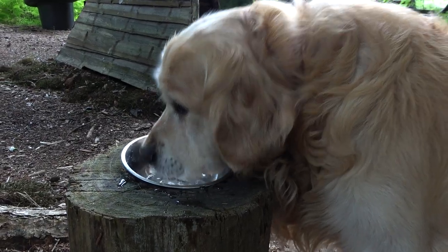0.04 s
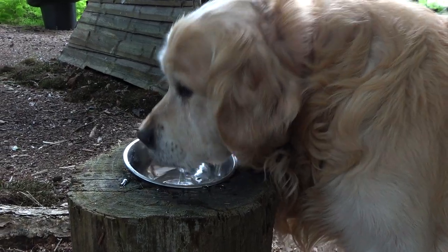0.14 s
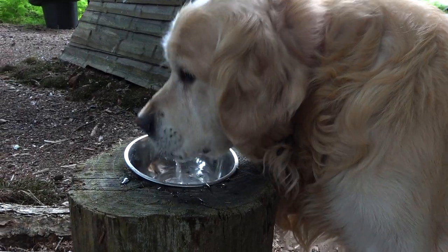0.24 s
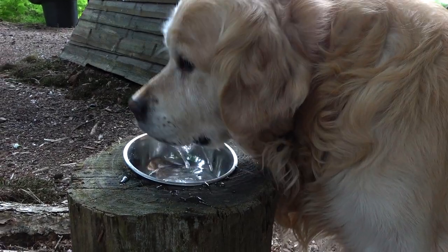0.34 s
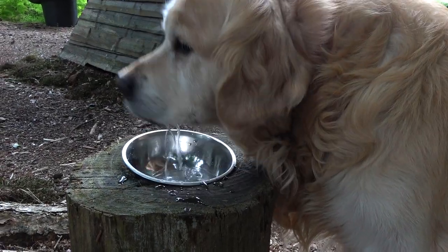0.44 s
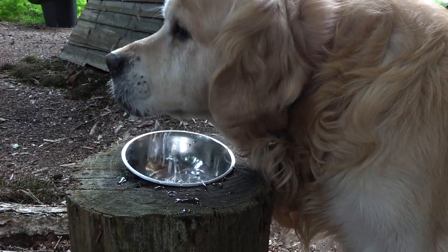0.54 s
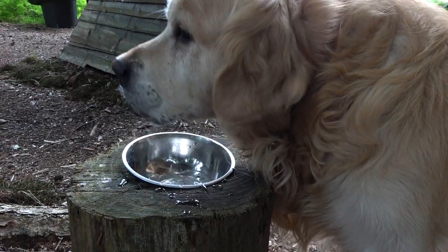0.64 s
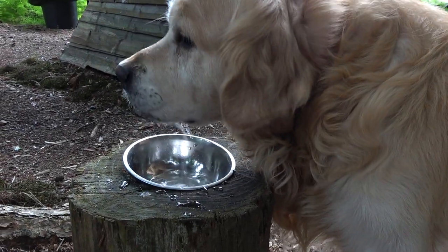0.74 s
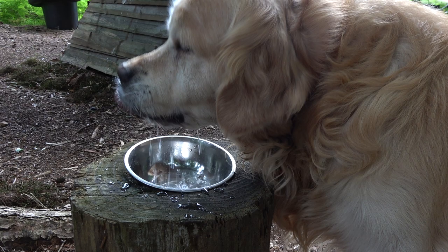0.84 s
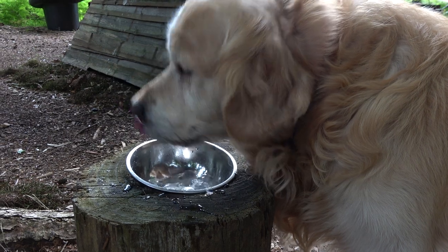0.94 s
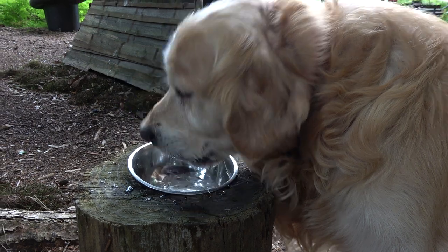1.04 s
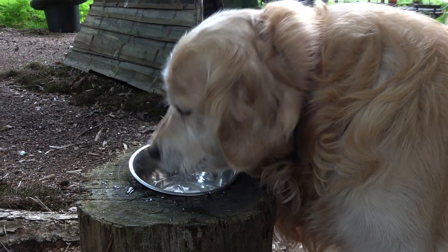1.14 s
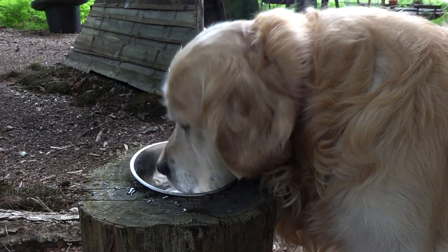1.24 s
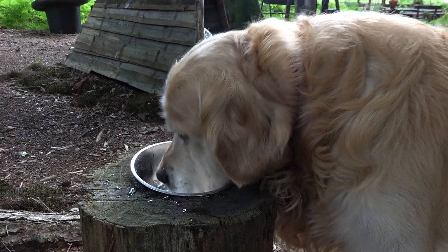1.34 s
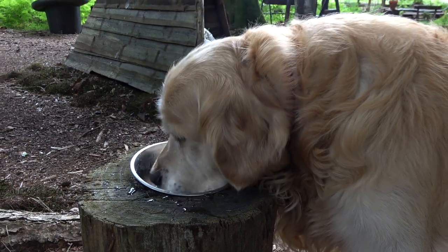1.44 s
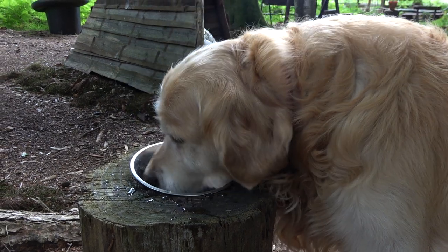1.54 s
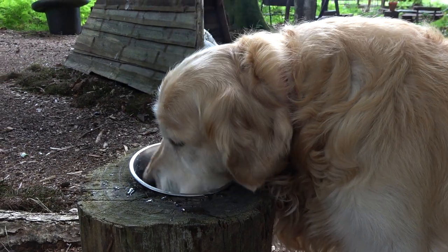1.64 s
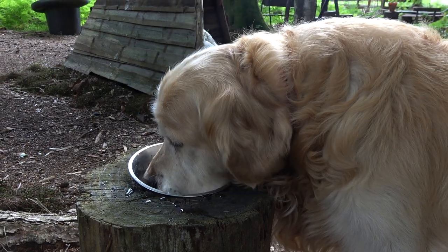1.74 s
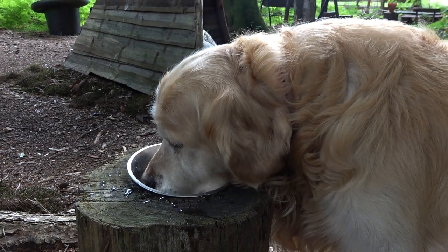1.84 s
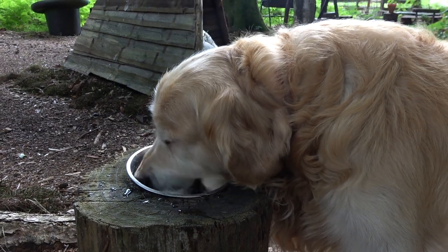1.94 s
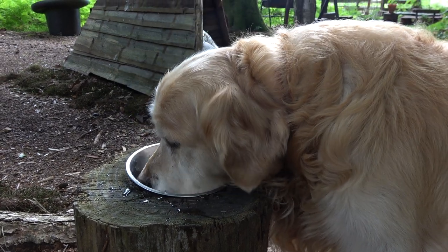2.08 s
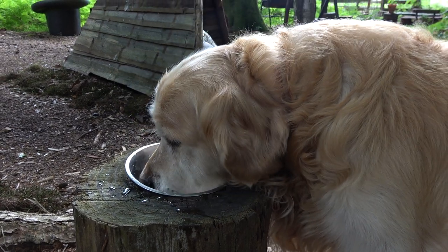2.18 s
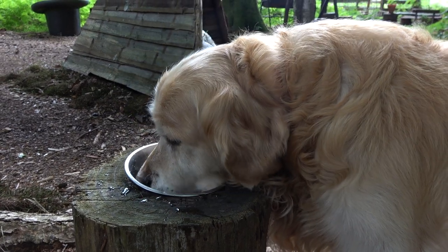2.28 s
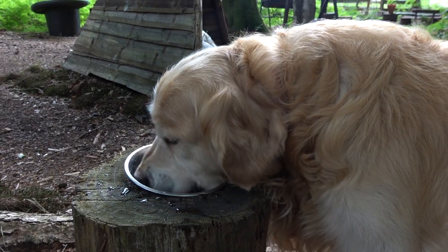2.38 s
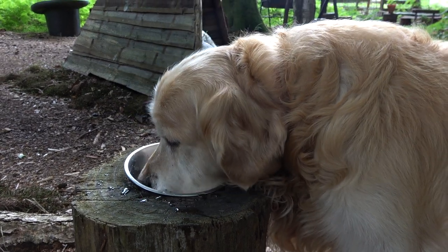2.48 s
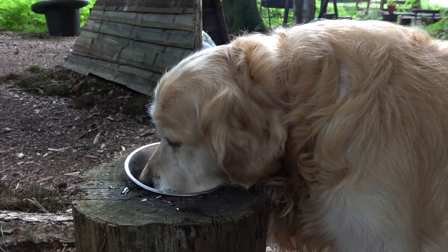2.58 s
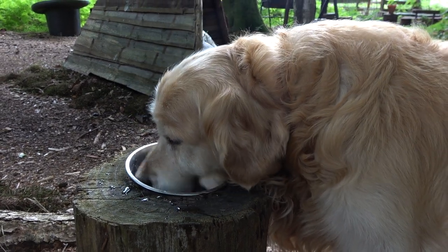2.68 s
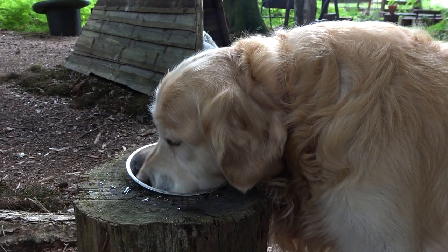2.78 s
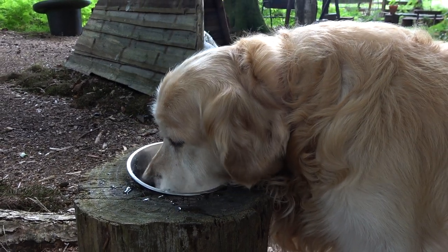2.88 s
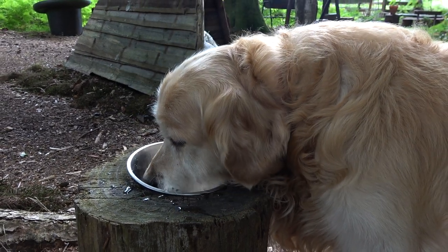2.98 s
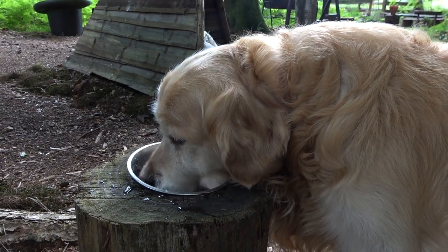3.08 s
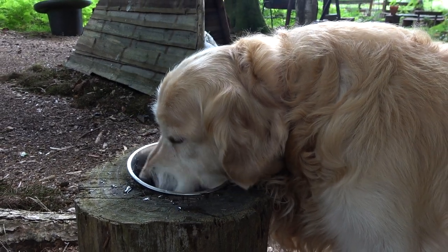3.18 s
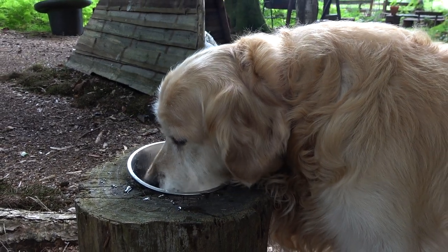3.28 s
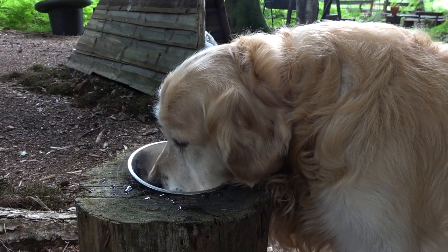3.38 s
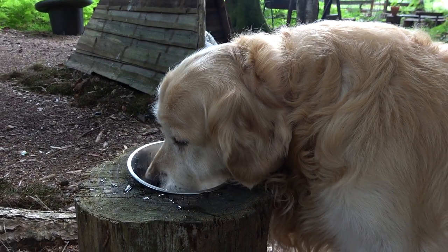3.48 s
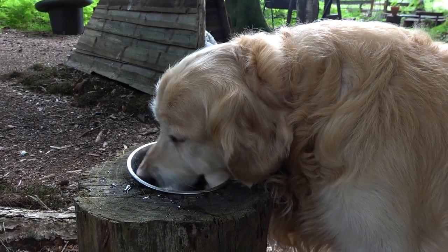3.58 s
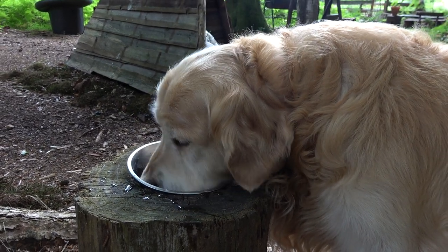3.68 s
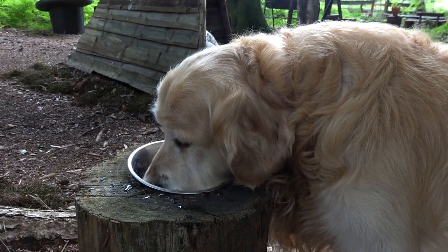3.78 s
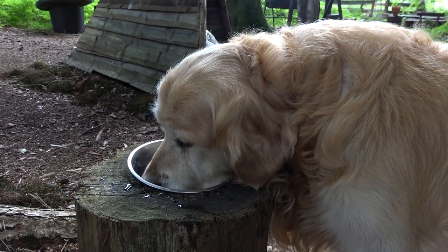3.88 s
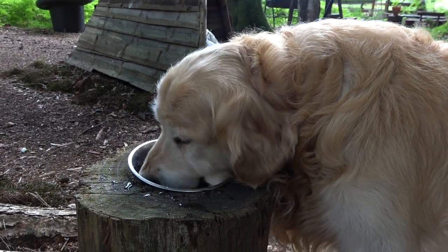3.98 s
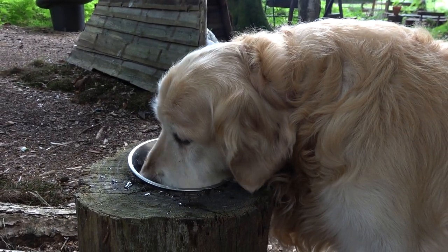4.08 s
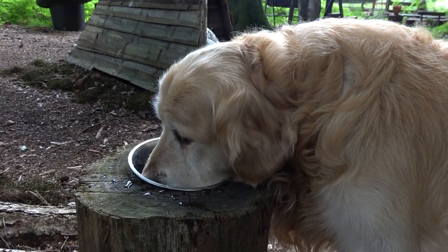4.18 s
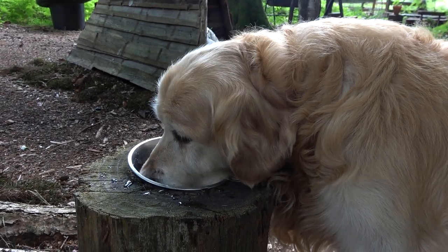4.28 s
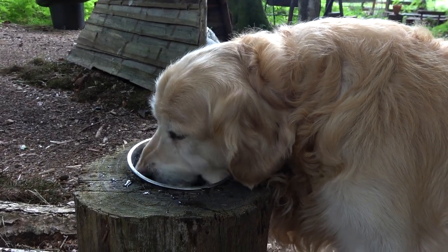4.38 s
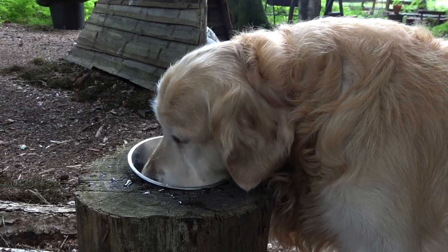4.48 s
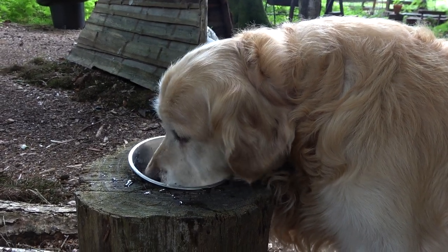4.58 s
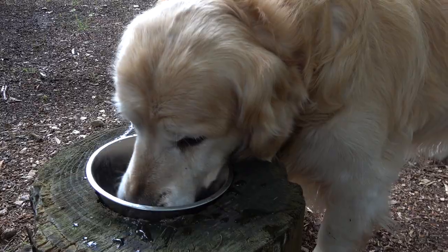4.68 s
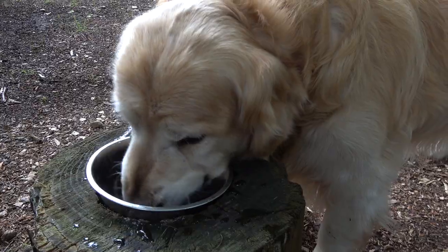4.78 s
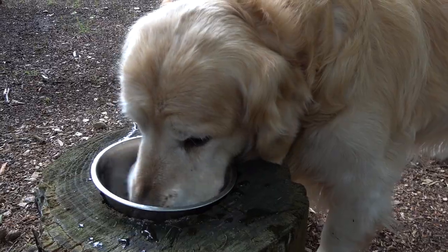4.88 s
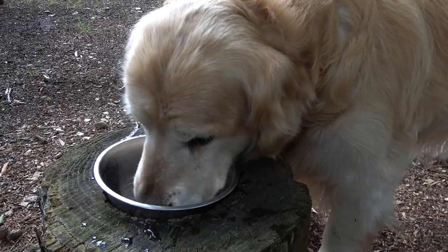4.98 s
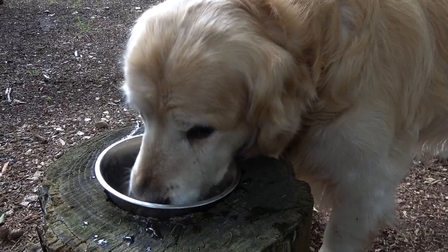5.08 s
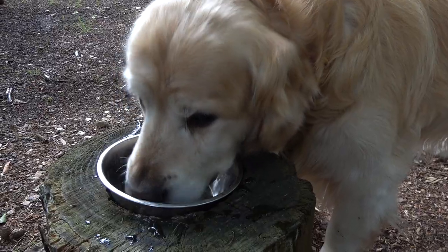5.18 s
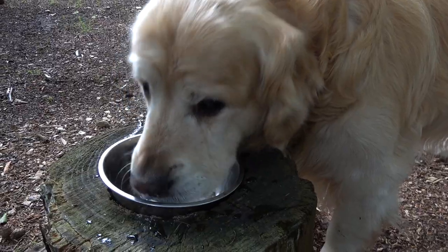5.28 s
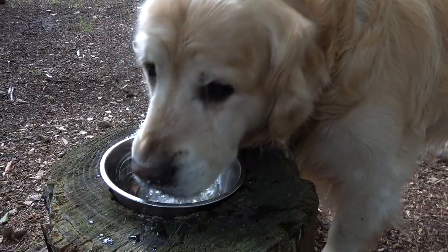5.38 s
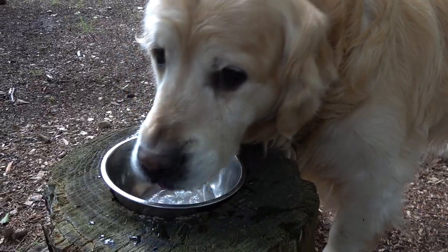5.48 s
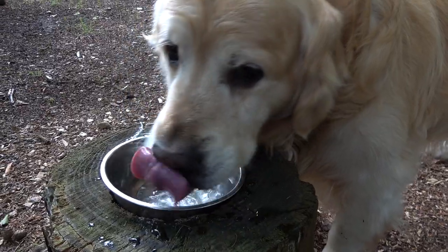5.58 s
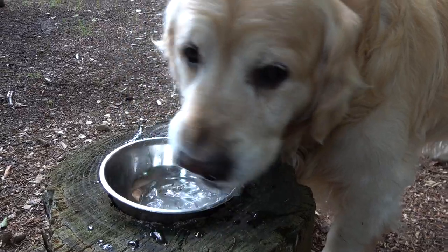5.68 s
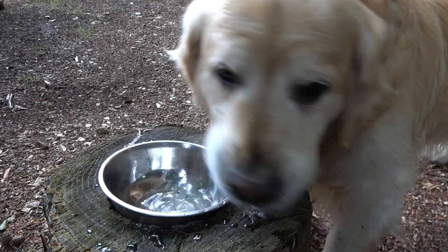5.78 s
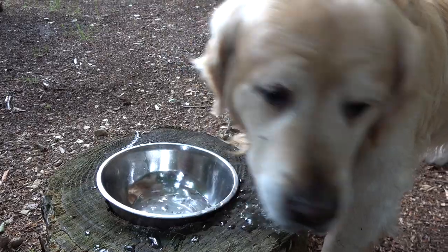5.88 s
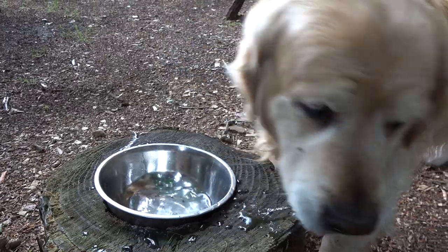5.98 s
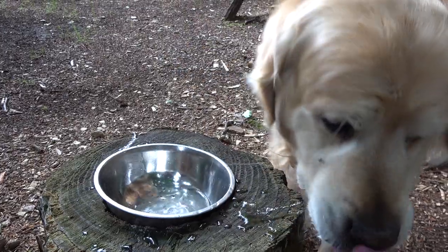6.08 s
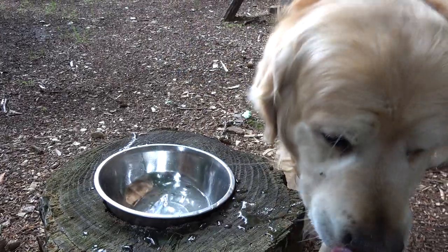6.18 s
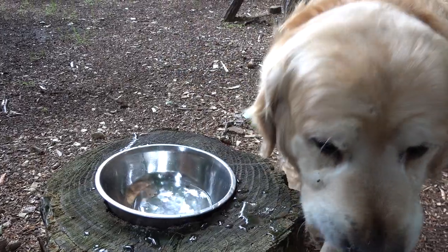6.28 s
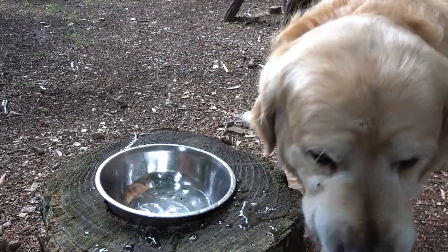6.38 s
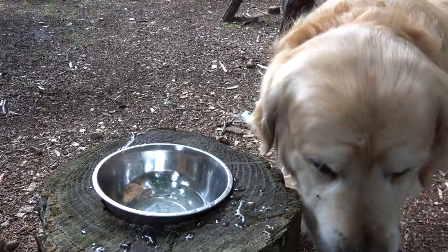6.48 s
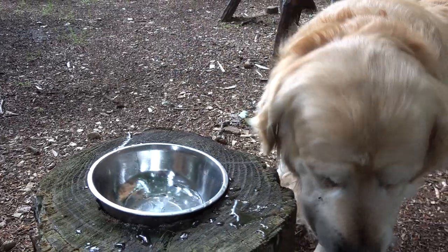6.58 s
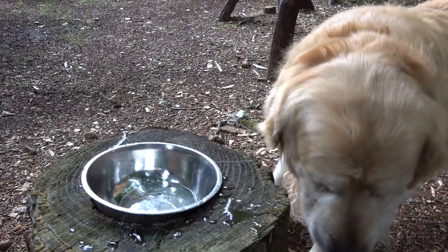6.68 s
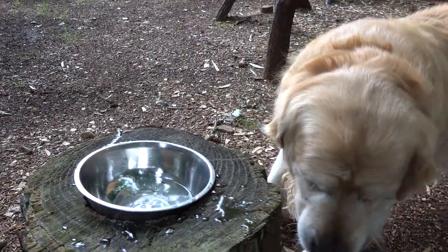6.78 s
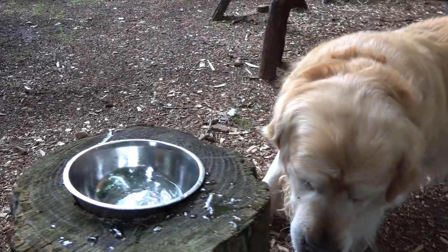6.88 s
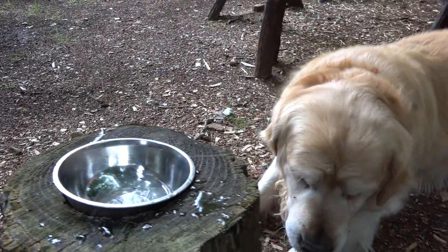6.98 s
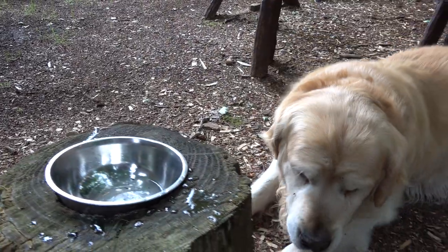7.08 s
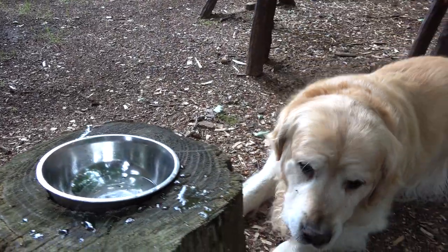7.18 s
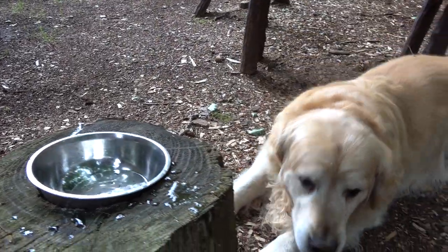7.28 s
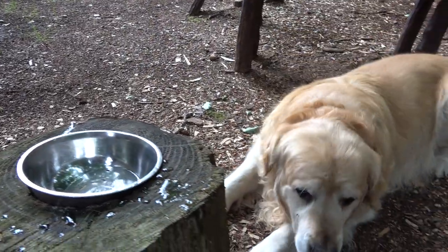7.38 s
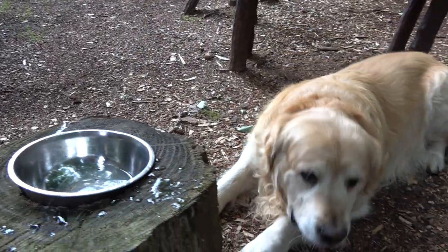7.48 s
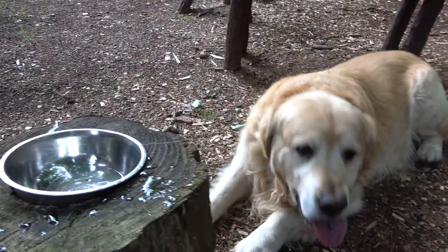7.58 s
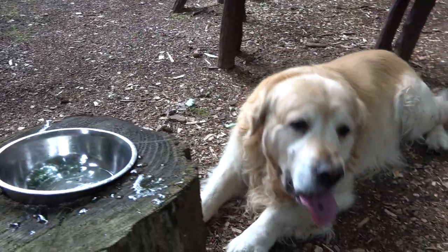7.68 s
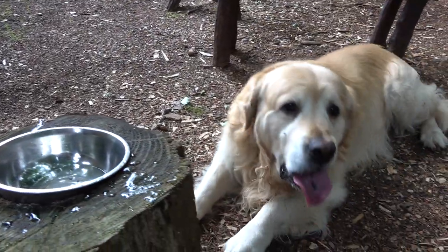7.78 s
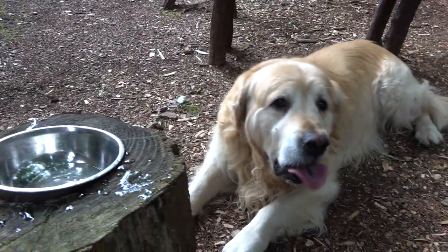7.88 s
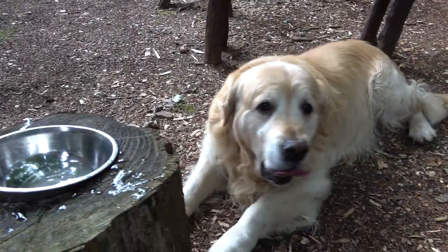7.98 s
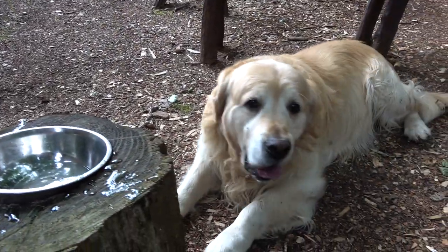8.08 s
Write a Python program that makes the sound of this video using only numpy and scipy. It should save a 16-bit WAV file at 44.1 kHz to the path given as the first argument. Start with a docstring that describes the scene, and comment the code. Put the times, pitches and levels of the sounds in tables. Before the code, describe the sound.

A dog drinks right by the microphone, outdoors and nearly dry of echo apart from the bowl's short ring. Sparse smacks and drips lead into fast regular laps, each a sharp wet plunge followed by bubbling slosh and crackling spray. Then the water settles, with isolated gulps, licks, nose puffs and short breathy pants against very quiet woodland air and low wind rumble.

```python
"""In a wood, close by, a big dog laps water from a steel bowl on a tree stump.
Each tongue stroke traps air pockets that ring briefly, throws spray of dense tiny pockets and noise,
and leaves the water sloshing. Between drinks the dog gulps (pockets of sinking pitch), smacks wet lips
(bright noise bursts), snuffles and pants (noise through throat and nose resonances).
Filtered noise makes a faint forest hush, a rumble and a thin far whir; low wavering tones hum briefly."""
import sys
import numpy as np
from scipy import signal
from scipy.fft import rfft, irfft, next_fast_len
from scipy.io import wavfile
from scipy.ndimage import map_coordinates

SR = 44100
rng = np.random.default_rng(int(sys.argv[2]) if len(sys.argv) > 2 else 0)


def generate_wav(sig):
    """Save sig (samples, or channels by samples) to the path in sys.argv[1] as 16-bit PCM at SR."""
    pcm = np.round(np.clip(np.atleast_2d(sig).T, -1, 1) * 32767).astype(np.int16)
    wavfile.write(sys.argv[1], SR, pcm)


N = 358974

# Forest hush spectrum. Each row: frequency in Hz, relative density in dB per Hz.
HUSH_SPECTRUM = [(88, 4.5), (150, 3.5), (197, 0.5), (487, 4.5), (780, -3), (877, -10), (1110, -1.5),
                 (1680, -12.5), (5890, -12), (15100, -16.5), (16300, -17)]
HUSH_DB = -52.5
# Low rumble spectrum. Each row: frequency in Hz, relative density in dB per Hz.
RUMBLE_SPECTRUM = [(12, -37), (20, -3.5), (54, -10), (97, -6), (182, -8.5), (216, -12), (250, -8),
                   (320, -34), (550, -120)]
# Wind and handling at the microphone ports. Each row: time in seconds, mean level in dB.
RUMBLE_LEVEL = [(0.0, -53), (0.25, -56), (1.18, -70), (2.15, -61), (3.35, -72.5), (6.44, -58), (6.73, -61),
                (7.12, -55.5), (7.68, -51.5), (8.14, -62)]
# Likeness of the two channels of the surroundings. Each row: frequency in Hz, correlation (0 to 1).
CHANNEL_LIKENESS = [(30, .4), (100, .65), (300, .45), (1300, .75), (4400, .4), (14000, .1)]
# A thin far band of noise. Each row: time in seconds, level in dB.
WHIR_LEVEL = [(0, -52), (.1, -61), (.35, -71), (.55, -74), (.7, -96), (8.2, -95)]
# Resonance that shapes the whir: centre in Hz, width in Hz.
WHIR_RESONANCE = (2220, 60)

# Tongue lifting out, water falling back, drips and licks.
# Each row: start in seconds, gurgle strength in dB, spray strength in dB, hold in seconds.
STIRS = [(0.01, -43, -49, 0.073), (0.117, -48, -44.5, 0.0066), (0.368, -40.5, -78, 0.022),
         (0.451, -56, -35.5, 0.012), (0.545, -64, -50, .01), (0.591, -50, -50, .015),
         (0.699, -68, -41, 0.0044), (0.785, -36, -78, 0.0088), (0.826, -45, -68, .005),
         (0.875, -26, -35.5, 0.032), (0.927, -53, -43, 0.13), (1.067, -39, -50, 0.06),
         (1.212, -41, -59, .01), (1.273, -48, -48, 0.015), (1.398, -51, -63, .08), (1.499, -40, -68, .03),
         (1.554, -37.5, -43, .005), (1.662, -37, -41, 0.027), (1.734, -36.5, -42, 0.012),
         (1.815, -35.5, -59, 0.0065), (2.026, -45, -32.5, .015), (2.096, -36.5, -38.5, 0.084),
         (2.42, -36, -36, 0.014), (2.477, -36, -41.5, 0.0082), (2.518, -37.5, -36, 0.041),
         (2.856, -25, -37, 0.0027), (2.8, -57, -32.5, 0.025), (2.893, -50, -34.5, .005),
         (2.929, -31, -43, .003), (3.206, -32, -32, 0.014), (3.262, -36.5, -35, 0.032),
         (3.332, -45, -43.5, 0.018), (3.395, -46, -49, .003), (3.51, -40.5, -72, 0.023),
         (3.656, -26, -50, 0.018), (3.677, -45, -28.5, 0.019), (3.757, -31, -41, 0.0077),
         (3.817, -29, -40, 0.0021), (4.031, -44, -32, 0.0074), (3.89, -53, -53, 0.034),
         (4.086, -57, -39, 0.036), (4.123, -40.5, -41, .015), (4.18, -43, -47, 0.063),
         (4.297, -49, -47.5, 0.0042), (4.443, -31.5, -21.5, .003), (4.515, -32.5, -28.5, .003),
         (4.576, -38.5, -42, 0.011), (4.645, -29, -65, 0.028), (4.725, -29.5, -48, 0.0043),
         (4.78, -26.5, -48, 0.014), (4.86, -44, -35, 0.055), (4.994, -28, -34, 0.0026),
         (5.16, -27.5, -52, 0.029), (5.077, -39.5, -78, 0.026), (5.114, -38, -56, 0.05),
         (5.236, -35, -50, 0.035), (5.328, -46, -45, 0.056), (5.551, -40.5, -44.5, 0.25),
         (5.848, -35, -60, 0.0064), (5.893, -41, -45, 0.0027), (6.116, -34, -40, 0.0018),
         (6.194, -44.5, -51, 0.19), (6.273, -44, -49, .02), (6.44, -39, -56, 0.0024),
         (6.478, -49, -49.5, 0.018), (6.64, -47.5, -86, 0.071), (6.863, -43.5, -48.5, 0.03),
         (6.898, -40, -45, 0.024), (6.97, -36, -57, 0.022), (7.013, -53, -64, .01),
         (7.073, -38.5, -52.5, 0.014), (7.114, -53, -57.5, 0.18), (7.388, -57, -50.5, 0.22),
         (7.519, -38, -46.5, 0.07), (7.903, -42, -47.5, 0.022)]
# The tongue plunges into the water. Each row: time in seconds, gurgle and spray strength in dB.
PLUNGES = [(1.618, -23, -30.5), (1.996, -15, -27.5), (2.376, -18, -31.5), (2.756, -22, -32.5),
           (3.146, -13, -28), (3.607, -18.5, -27.5), (4.015, -17.5, -32.5), (4.391, -20, -35),
           (4.805, -21, -24.5)]
# Pairs are (gurgle, spray); the rise is that of a stir, and a plunge rises PLUNGE_STEEPER times faster.
RISE_DB_PER_S, FALL_DB_PER_S = [701, 623], [447, 385]
REST_DB = [-54.5, -71]  # the water left alone
PLUNGE_HOLD_S, PLUNGE_STEEPER = 0.0077, 7.1
# The tongue tip touches the surface TOUCH_S before it plunges, and holds as long.
TOUCH_S, TOUCH_DB, TOUCH_SPRAY_DB = 0.018, -37.5, -57.5
# The wave of a plunge glugs back off the rim.
BACKWASH_S, BACKWASH_DB, BACKWASH_HOLD_S = 0.276, -42.5, 0.056
# Mist in the spray. Each row: frequency in Hz, relative density in dB per Hz.
MIST_SPECTRUM = [(900, -33), (2000, 0), (3200, -28), (6500, 3.5), (11000, 7.5), (16500, 12)]

# Low hums. Each row: start in seconds, end in seconds, mean frequency in Hz, mean channel peak in dB.
HUMS = [(0.036, 0.203, 92, -51), (1.387, 1.542, 94.4, -48.5), (7.665, 7.82, 91.8, -45.5)]
# Wet films snapping on tongue and lips. Each row: time in seconds, strength in dB.
SMACKS = [(0.1086, -20), (0.4097, -17), (0.5421, -16.5), (0.6223, -23.5), (0.6947, -23), (0.4828, -20),
          (0.8596, -22), (0.8842, -8.5), (0.892, -5), (0.9118, -13), (1.0638, -16), (1.1474, -17.5),
          (1.232, -17), (1.5535, -27), (1.619, -17.5), (1.7492, -13), (1.8234, -23), (1.998, -14),
          (2.1025, -3), (2.1228, -7), (2.3785, -9.5), (2.4755, -18), (2.4965, -14), (2.7557, -6.5),
          (2.77, -19), (2.848, -12), (2.859, -5.5), (2.9255, -19), (2.9316, -14.5), (3.1983, -10),
          (3.2622, -14), (3.2938, -10), (3.33, -21), (3.611, -0.5), (3.6917, -15), (3.74, -14),
          (3.7688, -11), (3.818, -13), (3.823, -11.5), (4.0154, -15), (4.126, -16), (4.192, -19.5),
          (4.301, -22.5), (4.3886, -9), (4.4005, -6), (4.435, -6), (4.4651, -10), (4.5093, -11.5),
          (4.5154, -15), (4.5697, -11), (4.7298, -13.5), (4.7742, -17), (4.791, -10), (4.81, -22),
          (4.8336, -13), (4.912, -12), (4.9544, -13), (5.162, -22), (5.2626, -12.5), (5.337, -16.5),
          (5.393, -26.5), (5.5, -24), (5.5456, -13.5), (5.565, -15), (5.7656, -16), (5.8467, -15.5),
          (6.131, -16), (6.323, -25), (6.442, -20.5), (6.914, -17.5), (7.004, -27), (6.648, -29.5),
          (6.713, -28), (7.363, -23.5), (7.447, -27)]
# Air pockets that stand out, in water and mouth.
# Each row: start in seconds, pitch at the peak in Hz, peak in dB, life in milliseconds.
BUBBLES = [(0.1092, 415, -8, 4), (0.4101, 2270, -18, 0.96), (0.4562, 483, -26.5, 28),
           (0.4695, 516, -18, 5.4), (0.5425, 1260, -22, 1.2), (0.5429, 396, -8, 4.6),
           (0.6278, 2200, -23, 0.62), (0.697, 2020, -31.5, 3.4), (0.7836, 920, -27.5, 3.6),
           (0.7942, 940, -22.5, 1.8), (0.8742, 3460, -19.5, 1.9), (0.8877, 3750, -19, 1.5),
           (0.8907, 457, -17, 2.8), (1.0639, 420, -20.5, 2.9), (1.105, 522, -40, 18), (1.135, 595, -43, 14),
           (1.1402, 3580, -37.5, 4.1), (1.2329, 570, -9.5, 6.2), (1.6053, 1530, -13.5, 0.51),
           (1.6224, 451, -14, 4.6), (1.6228, 1370, -20, 0.56), (1.6306, 597, -19, 5.7),
           (1.6328, 1450, -17, 1.7), (1.658, 1450, -12.5, 1.8), (1.6594, 524, -21.5, 8.8),
           (1.6647, 1150, -13, 1.4), (1.705, 1340, -26.5, 3.9), (1.7379, 686, -15, 1.6),
           (1.75, 1470, -15.5, 0.96), (1.7632, 770, -12.5, 2.6), (1.7804, 1450, -19.5, 1.4),
           (1.823, 3300, -24.5, 0.46), (1.999, 1330, -5, 1.9), (2.0103, 860, -13, 2.6),
           (2.092, 1960, -18.5, 2.4), (2.103, 1340, -13, 2.9), (2.1048, 540, -16.5, 2.7),
           (2.134, 1170, -11.5, 0.68), (2.1576, 1520, -20, 1.9), (2.3657, 4030, -27, 1.1),
           (2.3777, 1130, -6, 1.4), (2.3781, 1986, -11.5, 2.9), (2.3812, 469.6, -10.5, 4.3),
           (2.3871, 1820, -15, 1.5), (2.397, 1080, -13, 4.6), (2.41, 584, -17.5, 5.6),
           (2.4761, 3180, -12.5, 0.39), (2.4768, 740, -16.5, 3.4), (2.517, 620, -25, 2.5),
           (2.5304, 1230, -23.5, 1.8), (2.5586, 570, -28, 9.7), (2.755, 1330, -6.5, 1.4),
           (2.762, 950, -13, 2.1), (2.7665, 536, -11.5, 8.5), (2.7688, 1220, -9.5, 1.6),
           (2.7886, 700, -18, 3.5), (2.8041, 2650, -17, 2.1), (2.804, 1310, -18.5, 2),
           (2.8827, 730, -23, 6), (2.8583, 1130, -21, 2.4), (2.9185, 1020, -16.5, 1.7),
           (2.9266, 1730, -16, 1.3), (2.9333, 3480, -12.5, 0.44), (3.0697, 514, -26, 1.9),
           (3.145, 430, -15, 7.2), (3.1451, 1720, -7, 2.7), (3.1489, 890, -10.5, 2.2),
           (3.1516, 2050, -14.5, 2.6), (3.1566, 470, -18, 17), (3.1584, 1460, -12, 1.3),
           (3.163, 1420, -20, 3.1), (3.2065, 680, -9, 3.2), (3.2135, 920, -13.5, 1.7),
           (3.2621, 604, -18, 3), (3.2775, 1210, -22, 1.9), (3.331, 1230, -17.5, 1.36),
           (3.338, 1550, -18, 0.91), (3.4475, 1030, -27, 1.8), (3.606, 930, -16, 6.9),
           (3.605, 1650, -5.5, 2.5), (3.6073, 3140, -9.5, 0.86), (3.6115, 1460, -9.5, 4.5),
           (3.6165, 1150, -3.5, 2.6), (3.6257, 545, -17.5, 4.4), (3.691, 6330, -10.5, 2.4),
           (3.689, 1460, -21.5, 5), (3.721, 3600, -17.5, 0.59), (3.7343, 726, -17, 1.3),
           (3.8, 1320, -16.5, 1.8), (3.8163, 3600, -17, 0.83), (4.0153, 2170, -4.5, 0.3),
           (4.0187, 1540, -4.5, 2.3), (4.0198, 3140, -14, 0.78), (4.0372, 1130, -10, 1.4),
           (4.0491, 1150, -11, 3), (4.103, 2870, -27, 2.4), (4.1833, 1320, -12.5, 1.3),
           (4.231, 900, -30, 11), (4.234, 3780, -24.5, 1.8), (4.3117, 497, -25.5, 2.8),
           (4.39, 1560, -16, 1.1), (4.3892, 3300, -10.5, 0.58), (4.396, 820, -12.5, 3.2),
           (4.401, 1530, -11.5, 1.4), (4.401, 3030, -8.5, 1.1), (4.4048, 550, -16, 3.7),
           (4.414, 1010, -14, 1.6), (4.4352, 2800, -12.5, 0.74), (4.4367, 1180, -10.5, 1.5),
           (4.455, 7900, -20.5, 1.2), (4.4625, 1560, -13, 1.8), (4.463, 2820, -13, 0.81),
           (4.4976, 1020, -20.5, 2.5), (4.5915, 576, -21.5, 2.5), (4.73, 720, -16, 1.9),
           (4.775, 2280, -15, 0.43), (4.804, 2720, -17, 1), (4.8065, 560, -4, 5.8), (4.8044, 1220, -9, 1.3),
           (4.8093, 1084, -8, 3.6), (4.8184, 763, -15.5, 13.5), (4.8268, 520, -9.5, 7.3),
           (4.8331, 3050, -10, 0.81), (4.8437, 915, -13.5, 2.8), (4.8482, 1550, -9, 0.79),
           (4.8834, 1850, -8, 1.8), (4.9114, 720, -9.5, 1.9), (4.9533, 900, -19, 0.95),
           (4.991, 1130, -23, 3.9), (5.0095, 520, -23, 4.7), (5.1673, 1044, -11.5, 2.4),
           (5.1736, 2020, -25, 4), (5.188, 2650, -26.5, 2.6), (5.222, 506, -29.5, 6.4),
           (5.2586, 2070, -29.5, 9.1), (5.283, 470, -35.5, 9.2), (5.3365, 409, -8, 5),
           (5.3422, 2300, -25.5, 2.4), (5.7553, 4240, -18.5, 0.66), (5.8479, 450, -10, 9.2),
           (6.0699, 3530, -20, 0.12), (6.1212, 986, -22, 6.7), (6.1243, 470, -24, 5.7),
           (6.3243, 3040, -26.5, 0.9), (6.3567, 2830, -29.5, 5.5), (6.358, 1720, -42, 5.7),
           (6.375, 2600, -42, 4.1), (6.4406, 491, -12.5, 6.6), (6.608, 450, -31, 1.6),
           (6.6882, 970, -28, 2), (6.902, 830, -21, 4), (6.9149, 3280, -10.5, 0.89),
           (6.9145, 1003, -17.5, 4.6), (7.0059, 2220, -14, 0.18), (7.0061, 352, -25.5, 6.4),
           (7.127, 448, -27, 2.4)]
# Breaths. Each row: start in seconds, end in seconds, level in dB, low resonance in Hz,
# high resonance in Hz, high resonance gain in dB, hiss gain in dB.
BREATHS = [(0.429, 0.51, -35.5, 455, 2390, -11, -32), (5.55, 5.796, -38, 480, 2960, -1.5, -11),
           (6.154, 6.298, -44.5, 905, 2930, 15, 3.5), (7.096, 7.235, -41, 1070, 2150, -9.5, -17.5),
           (7.481, 7.586, -34.5, 470, 1690, -4.5, -23), (7.606, 7.813, -42, 940, 2040, -9, -15),
           (7.818, 7.964, -40, 880, 1760, -5.5, -24), (7.958, 8.122, -46.5, 806, 1710, -13, -22.5)]
# The hollow that a plunge leaves, opening just after it; pitch and level are the centres of a scatter.
CAVITY_LATE_S, CAVITY_LIFE_S, CAVITY_CLIMB = 0.00507, .028, .55
CAVITY_HZ, CAVITY_DB = 429.5, -26

# Treble loss on the way from the bowl. Each row: frequency in Hz, gain in dB.
TREBLE_LOSS = [(8000, 0.5), (11000, -4), (13000, -9), (16000, -17.5)]
# Answer of bowl, stump and ground. Each row: frequency in Hz, time to decay by 60 dB in seconds.
BOWL_DECAY = [(300, 0.06), (1500, 0.042), (5000, 0.035), (14000, 0.054)]
# Side level by frequency. Each row: frequency in Hz, gain in dB.
SIDE_GAIN = [(300, -21.5), (700, -36.5), (1300, -52), (2400, -23.5), (4400, -13), (8000, -11), (15000, -6)]
TOP_HZ = 16100  # centre of the final treble cutoff


def amp(db):
    """Decibels are logarithmic: 20 dB is a tenfold amplitude."""
    return 10 ** (np.asarray(db) / 20)


def unit(x):
    """Root-mean-square normalisation: x is scaled to rms 1."""
    return x / np.sqrt(np.mean(x ** 2) + 1e-20)


def along(points, hz):
    """Interpolation of (Hz, value) points on a logarithmic frequency axis."""
    f, v = np.transpose(points)
    return np.interp(np.log(hz + 1), np.log(f + 1), v)


def curve(rows):
    """Linear interpolation of (seconds, value) rows, one value per sample."""
    s, value = np.transpose(rows)
    return np.interp(np.arange(N) / SR, s, value)


def wobble(rate):
    """Band-limited fluctuation: a smooth curve through random knots, rate of them a second."""
    knots = rng.standard_normal(int(N * rate / SR) + 4)
    return map_coordinates(knots, [np.arange(N) * rate / SR])


def clumped(rate, depth_db):
    """Amplitude modulation by a random gain bounded to twice depth_db either way."""
    return amp(depth_db * 2 * np.tanh(wobble(rate) / 2))


def filtered(x, response):
    """Linear filtering: the spectrum of x times a response of frequency."""
    size = next_fast_len(x.shape[-1] + 8192)  # room for the tail
    spectrum = rfft(x, size) * response(np.fft.rfftfreq(size, 1 / SR))
    return irfft(spectrum, size)[..., :x.shape[-1]]


def resonance(f, hz, width_hz):
    """Response of one damped, causal resonator with gain 1 at its centre."""
    return 1j * f * width_hz / (hz * hz - f * f + 1j * f * width_hz + 1e-9)


def overlay(s, waves):
    """Superposition: each row of waves is added into one line from its start s in seconds."""
    size = waves.shape[1]
    at = np.round(s * SR).astype(int)[:, None] + np.arange(size)
    return np.bincount(at.ravel(), waves.ravel(), N + size + SR)[:N]


def rings(s, hz, gain, life, rise, size):
    """Bubble oscillation: a quick swell, a decay, and a pitch that climbs by rise (or sinks if negative)."""
    t = np.arange(size) / SR
    u = t / (0.41 * life[:, None])  # 1 at the peak
    glide = 1 - rise[:, None] / 2 + rise[:, None] * np.minimum(u, 6) / 4
    turns = hz[:, None] * t * glide
    envelope = gain[:, None] * u * np.exp(1 - u)
    return overlay(s, envelope * np.sin(2 * np.pi * turns))


def swarm(count, hz, octaves, cycles, spread_db, size):
    """Many independent bubbles of scattered pitch and strength sum to a texture of rms 1."""
    when, tone, last, luck = rng.random((count, 4)).T
    pitch = np.clip(hz * 2 ** (octaves * rng.standard_normal(count)), 300, 14000)
    polarity = np.sign(tone - .5)
    gain = amp(-spread_db * np.log(luck + 0.0018)) * polarity  # few are strong
    life = cycles * (.5 + last) / pitch
    return unit(rings(when * N / SR, pitch, gain, life, 0.29 * tone, size))


def rush(spectrum):
    """Partly correlated stereo noise of rms 1: the mid-side balance sets the likeness at each frequency."""
    def mid_side(hz):
        turn = np.arccos(np.clip(along(CHANNEL_LIKENESS, hz), -1, 1)) / 2
        return amp(along(spectrum, hz)) * [np.cos(turn), np.sin(turn)]
    mid, side = filtered(rng.standard_normal((2, N)), mid_side)
    return unit(np.array([mid + side, mid - side]))


def wood():
    """Spectrally shaped noise: forest hush, fluctuating low rumble at the ports, and a thin far whir."""
    hush = amp(HUSH_DB + 0.27 * wobble(1.81)) * rush(HUSH_SPECTRUM)
    tilt_db = [[1.6], [-1.6]]  # left stronger
    rumble = amp(curve(RUMBLE_LEVEL) + 2.3 * wobble(19) + tilt_db) * rush(RUMBLE_SPECTRUM)
    whir = unit(filtered(rng.standard_normal(N), lambda f: resonance(f, *WHIR_RESONANCE) ** 2))
    return hush + rumble + amp(curve(WHIR_LEVEL)) * whir


def stirring():
    """Addition of powers: gurgle and spray in dB from strokes that each swell, hold and die away."""
    stirs = [(*stir, 1) for stir in STIRS]
    plunges = [(*plunge, PLUNGE_HOLD_S, PLUNGE_STEEPER) for plunge in PLUNGES]
    touches = [(s - TOUCH_S, TOUCH_DB, TOUCH_SPRAY_DB, TOUCH_S, 1) for s, *_ in PLUNGES]
    backwash = [(s + BACKWASH_S, BACKWASH_DB, REST_DB[1], BACKWASH_HOLD_S, 1) for s, *_ in PLUNGES[:-1]]
    rows = stirs + plunges + touches + backwash
    s, gurgle, spray, hold, steeper = np.transpose(rows)[:, :, None]
    t = np.arange(0, N, 32) / SR  # coarse time steps suffice
    early = steeper * np.maximum(s - t, 0)
    late = np.maximum(t - s - hold, 0)
    levels = []
    for db, up, down, rest in zip([gurgle, spray], RISE_DB_PER_S, FALL_DB_PER_S, REST_DB):
        stroke_db = db - up * early - down * late
        power = amp(2 * rest) + amp(2 * stroke_db).sum(0)
        levels.append(np.interp(np.arange(N) / SR, t, 10 * np.log10(power)))
    return levels


def slosh():
    """Bubble entrainment: gentle stirring glugs; harder spray adds small pockets that slurp, crackle, fizz."""
    gurgle_db, spray_db = stirring()
    clumps = clumped(60, depth_db=3.5)
    glug = swarm(count=4000, hz=516, octaves=0.287, cycles=3.3, spread_db=3.0, size=1200)
    slurp = swarm(count=14000, hz=1483, octaves=0.698, cycles=3.76, spread_db=3.5, size=700)
    fizz = swarm(count=12000, hz=4503, octaves=0.803, cycles=6.7, spread_db=4.0, size=300)
    crackle = swarm(count=2500, hz=4580, octaves=0.78, cycles=1.24, spread_db=7.5, size=100)
    mist = unit(filtered(rng.standard_normal(N), lambda f: amp(along(MIST_SPECTRUM, f))))
    glug_db = np.minimum(gurgle_db - 8.0, -28)  # the shallow bowl holds only so many large pockets
    slurp_db = 0.74 * gurgle_db + 0.34 * spray_db + 0.5
    low = amp(glug_db) * unit(clumped(40, depth_db=4.5) * glug)
    middle = amp(slurp_db) * unit(clumps * slurp)
    spray = unit(clumps * clumped(110, depth_db=4.0) * (fizz + 0.63 * crackle + 0.59 * mist))
    return low + middle + amp(spray_db) * spray


def hums():
    """Frequency modulation: each hum is a slightly unsteady sine under a half-sine swell."""
    t = np.arange(N) / SR
    waver = np.cumsum(1 + 0.07 * wobble(27)) / SR  # unevenly running time
    total = np.zeros(N)
    for start, end, hz, db in HUMS:
        swell = np.sin(np.pi * np.clip((t - start) / (end - start), 0, 1))
        total += amp(db) * swell * np.sin(2 * np.pi * hz * waver)
    return total


def smacks():
    """Impulsive film rupture: each snap is a burst of bright noise a few milliseconds long."""
    s, db = np.transpose(SMACKS)
    t = np.arange(800) / SR
    decay = amp(-60 * t / 0.008) + 0.025 * amp(-60 * t / 0.02)
    tear = 1 - np.exp(-t / 0.00056)  # the film takes a moment to tear
    bursts = rng.standard_normal((len(s), len(t))) * decay * tear
    line = overlay(s, amp(db)[:, None] * bursts)
    return filtered(line, lambda f: resonance(f, 7460, 7100) * resonance(f, 3200, 14000))


def bubbles():
    """Resonance of trapped air: plops and blips climb; deep short gulps sink as the throat opens."""
    s, hz, db, life_ms = np.transpose(BUBBLES)
    gulp = (hz < 470) & (life_ms < 6.5)
    rise = np.where(gulp, -.22, 0.062 * rng.random(len(s)))
    return rings(s, hz, amp(db), life_ms / 1000, rise, size=3000)


def breaths():
    """Source and filter: air noise rushes through throat and nose resonances and hisses past the teeth."""
    air = np.zeros(N + SR)
    for start, end, db, low_hz, high_hz, high_db, hiss_db in BREATHS:
        u = np.linspace(0, 1, max(round((end - start) * SR), 9))

        def tract(f):
            low = resonance(f, low_hz, .5 * low_hz) ** 2
            high = amp(high_db) * resonance(f, high_hz, 0.22 * high_hz) ** 2
            return low - high + amp(hiss_db) * resonance(f, 2600, 3300)

        swell = np.minimum(1, u / 0.18) * np.minimum(1, (1 - u) / 0.52)
        noise = unit(filtered(rng.standard_normal(len(u)), tract))
        air[round(start * SR):][:len(u)] += amp(db) * swell * noise
    return air[:N] * clumped(70, depth_db=2.5)


def cavities():
    """Resonance of a shrinking cavity: the hollow behind the tongue fills, so its note climbs steeply."""
    s = np.transpose(PLUNGES)[0]
    vary = rng.standard_normal((len(s), 2))
    hz = CAVITY_HZ * (1 + 0.051 * vary[:, 0])
    gain = amp(CAVITY_DB + 1.6 * vary[:, 1])
    life, climb = np.full(len(s), CAVITY_LIFE_S), np.full(len(s), CAVITY_CLIMB)
    return rings(s + CAVITY_LATE_S, hz, gain, life, climb, size=4000)


def bowl(x):
    """Reverberation: short, dense reflections in which each frequency dies at its own speed."""
    hz, t, z = signal.stft(rng.standard_normal(SR // 8), SR, nperseg=128)
    decay = amp(-60 * t / along(BOWL_DECAY, hz)[:, None])
    tail = signal.istft(z * decay, SR, nperseg=128)[1]
    delayed = np.pad(x, (40, 0))  # in samples
    return signal.fftconvolve(delayed, tail / np.linalg.norm(tail))[:N]


def widened(x):
    """Stereo width: a diffuse copy, opposite in the two channels, is added at a level set by frequency."""
    smear = rng.standard_normal(1500) * amp(-60 * np.arange(1500) / SR / 0.015)
    diffuse = signal.fftconvolve(x, smear / np.linalg.norm(smear))[:N]
    side = filtered(diffuse, lambda f: amp(along(SIDE_GAIN, f)))
    side = side * np.tanh(2 * wobble(35))  # a slow random sign keeps the dog centred on average
    return x + np.array([side, -side])


def scene():
    """Superposition: the dog in the middle of the wood's hush; the dog's sounds carry no deep bass."""
    dog = bubbles() + cavities() + smacks() + slosh() + breaths()
    dog = filtered(dog, lambda f: amp(along(TREBLE_LOSS, f)) * (1j * f / (1j * f + 140)) ** 2)
    near = widened(dog + amp(-8.5) * bowl(dog))
    return near + wood() + hums() * amp([[2.5], [-2.5]])  # hums stronger on the left


def record(dry):
    """Saturation and band limiting: soft clipping at full scale, then a steep treble cutoff."""
    held = dry / (1 + np.abs(dry) ** 8) ** (1 / 8)
    return filtered(held, lambda hz: np.clip((TOP_HZ + 300 - hz) / 600, 0, 1) ** 2)


dry = scene()
out = record(dry)
generate_wav(out)
```